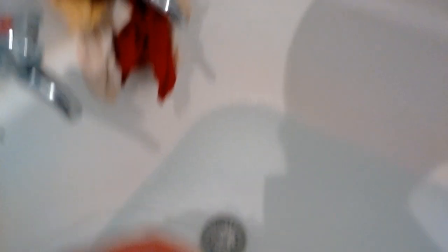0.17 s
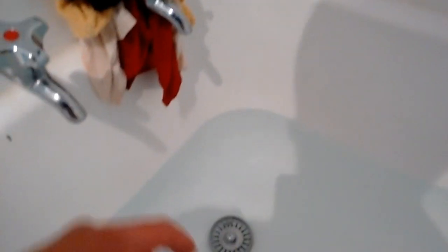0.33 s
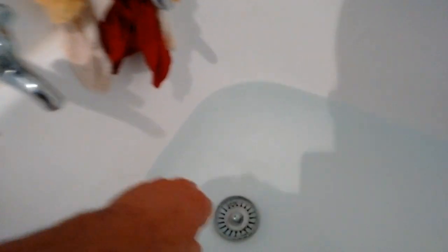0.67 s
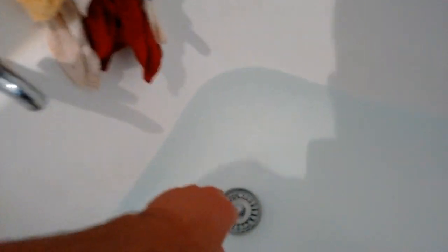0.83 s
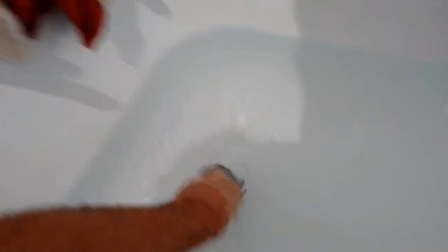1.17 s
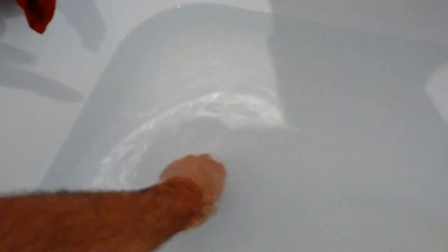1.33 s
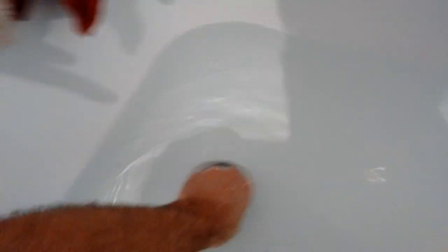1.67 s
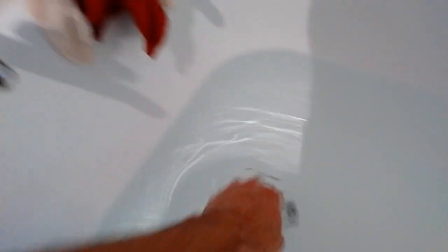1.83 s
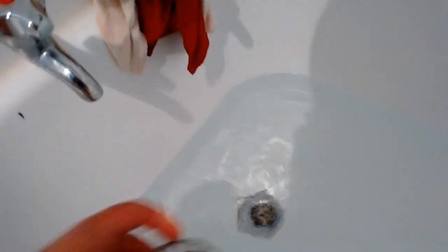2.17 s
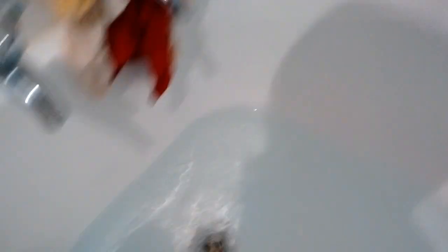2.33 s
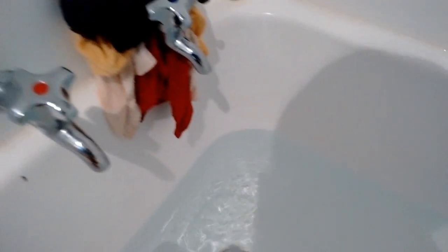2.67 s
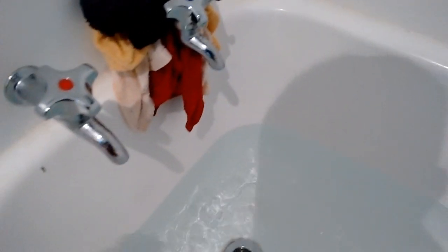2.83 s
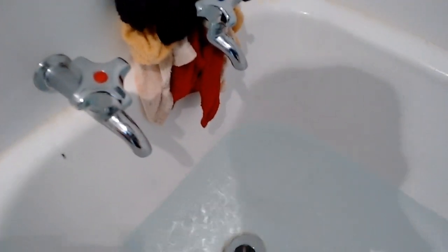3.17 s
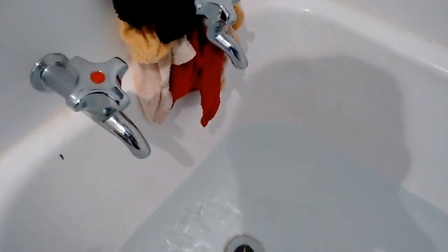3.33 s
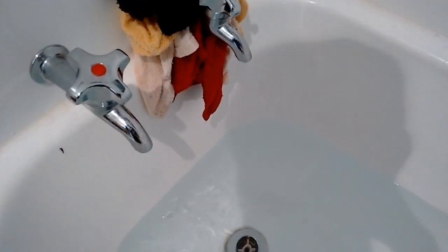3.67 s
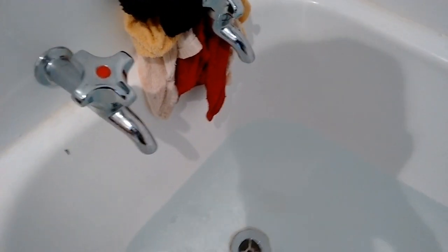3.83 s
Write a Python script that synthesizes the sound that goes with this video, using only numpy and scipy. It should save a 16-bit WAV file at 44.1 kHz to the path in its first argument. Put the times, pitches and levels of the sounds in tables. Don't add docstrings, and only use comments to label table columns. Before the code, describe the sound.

Water draining from a bathtub, with soft splashes, plopping bubbles and a growing gurgle

```python
import sys
import numpy as np
from scipy import signal
from scipy.fft import rfft, irfft
from scipy.io import wavfile
from scipy.ndimage import uniform_filter1d

SR = 44100
rng = np.random.default_rng(int(sys.argv[2]) if len(sys.argv) > 2 else 0)


def wav_out(sig):
    wavfile.write(sys.argv[1], SR, np.round(np.clip(np.atleast_2d(sig).T, -1, 1) * 32767).astype(np.int16))


def boost_factor(decibels):
    exponent = np.asarray(decibels, float) / 20
    return 10 ** exponent


N = 176400
START_S = 0.075

# (frequency [Hz], level [dB])
HISS_TONE = [(12, -10.5), (38, 0), (53, -13), (70, -43), (367, -23), (513, -28.5), (1760, -38),
             (11800, -40), (16000, -38)]
WHINES_HZ = 11330, 16150
# (time [s], level [dB])
CHURN = [(.05, -47), (.5, -48.5), (.7, -57.5), (1.0, -54.5), (1.65, -60), (1.82, -48), (2.14, -62),
         (2.2, -44.5), (2.3, -36.5), (2.345, -54), (2.38, -38), (2.55, -39.5), (2.74, -31.5), (2.86, -36.5),
         (3.25, -34), (3.65, -34), (3.85, -33), (4.0, -33)]
# (frequency [Hz], level [dB])
ROAR_TONE = [(25, 9), (45, 13.5), (110, -0.5), (450, -4.5), (1000, -9.5), (1800, -16), (3200, -16),
             (4500, -50)]
# (frequency [Hz], width [Hz], level [dB])
PIPE_MODES = [(114.4, 11.6, 11), (164.1, 5.7, 4.5), (330, 78, 6), (460.6, 6.8, 4), (699, 7.1, -8),
              (798, 9.8, -10.5)]
# (time [s], level [dB])
GRIP = [
    (.05, -92),
    (.4, -40),
    (.6, -38),
    (.7, -67),
    (1.65, -54),
    (1.85, -31.5),
    (2.15, -57),
    (2.75, -29),
    (3.3, -42),
    (4.0, -65),
]
# (frequency [Hz], level [dB])
GRIP_TONE = [(20, 28), (40, 11), (80, 11.5), (180, -3.5), (300, -63)]
# (time [s], level [dB], pitch [Hz])
KNOCKS = [(0.098, -23.5, 470), (0.18, -32, 493), (0.346, -31, 55), (0.41, -31, 472), (0.431, -30.5, 360),
          (0.553, -26.5, 81), (0.981, -37, 392), (1.012, -38, 400), (1.068, -38, 248), (1.554, -40, 463),
          (1.6, -46, 450), (1.727, -32.5, 302), (1.776, -31, 470), (1.792, -36, 524), (1.816, -44, 124),
          (1.839, -33, 149), (1.919, -33, 69), (2.165, -36, 300), (2.178, -24, 414), (2.244, -25.5, 365),
          (2.358, -23, 175), (2.39, -21.5, 109), (2.51, -22, 216), (2.586, -24, 346), (2.644, -23.5, 200),
          (2.683, -26, 168), (2.711, -29, 200), (2.731, -19, 350), (2.759, -22, 165), (2.774, -25, 197),
          (2.943, -24, 124), (3.079, -38, 170), (3.169, -34, 212), (3.362, -22, 111), (3.709, -26, 250),
          (3.728, -24, 300), (3.805, -26, 336), (3.846, -24, 174), (3.865, -15.5, 255), (3.882, -18.5, 380),
          (3.926, -20.5, 292), (3.954, -17.5, 305), (3.978, -15.5, 327)]
# (time [s], level [dB], pitch [Hz], length [cycles to die away])
BUBBLES = [(.1, -35.5, 694, 41), (.112, -38, 438, 68), (1.408, -23.5, 1374, 51), (1.427, -16, 1600, 22),
           (1.443, -24, 1360, 47), (1.813, -28.5, 1180, 30), (2.206, -30, 1094, 57), (2.268, -31, 1180, 56),
           (2.279, -28.5, 1275, 72), (2.356, -20, 1134, 24), (2.404, -28, 537, 56),
           (2.413, -24.5, 1210, 27), (2.432, -31, 505, 84), (2.477, -28.5, 2507, 82),
           (2.52, -26.5, 1050, 17), (2.537, -27, 960, 24), (2.684, -26, 1566, 106), (2.683, -24, 3170, 38),
           (2.715, -15.5, 3010, 52), (2.72, -20.5, 1184, 28), (2.731, -21, 1350, 50),
           (2.746, -22.5, 1520, 44), (2.761, -27.5, 1170, 33), (2.75, -25, 723, 88), (2.823, -34, 1220, 79),
           (2.877, -21.5, 2990, 64), (2.926, -28.5, 1340, 30), (3.011, -17, 3280, 43),
           (3.112, -29.5, 1024, 25), (3.136, -19.5, 1770, 33), (3.276, -12, 1074, 126),
           (3.424, -20, 810, 35), (3.434, -20.5, 836, 57), (3.472, -26, 820, 40), (3.52, -37, 4200, 33),
           (3.581, -17.5, 922, 52), (3.605, -24.5, 892, 100), (3.648, -35.5, 1334, 240),
           (3.69, -19, 2320, 42), (3.734, -25.5, 4430, 33), (3.792, -13, 3070, 27),
           (3.803, -26.5, 3360, 180), (3.961, -59, 1110, 25), (3.974, -32.5, 4220, 63),
           (3.978, -28, 930, 31)]
# (time [s], level [dB], pitch [Hz])
TICKS = [(0.2138, -37, 10100), (0.5618, -34.5, 10600), (1.314, -36, 11200), (1.371, -27, 5930),
         (1.4272, -14.5, 4350), (1.4545, -14, 11200), (1.577, -33, 13300), (2.4738, -32, 11300),
         (2.4972, -25.5, 5400), (2.6832, -25.5, 10600), (2.7024, -27.5, 8900), (2.7205, -20.5, 8400),
         (2.7569, -11.5, 11700), (2.801, -22, 8900), (2.852, -36, 11100), (2.874, -23, 5700),
         (2.944, -17.5, 11000), (3.0092, -14.5, 8900), (3.0318, -15, 12400), (3.135, -20.5, 12800),
         (3.347, -22.5, 11500), (3.446, -29, 11500), (3.6404, -25.5, 13600), (3.6624, -21, 6940),
         (3.685, -24, 12400), (3.738, -26.5, 12000), (3.7778, -27, 11100), (3.79, -16, 5450),
         (3.794, -18, 10600), (3.8626, -24.5, 11800), (3.892, -29.5, 12600)]
# (time [s], level [dB])
SPRAY = [(1.3, -72), (1.36, -58.5), (1.72, -81), (2.62, -67), (2.7, -51.5), (2.78, -55), (2.9, -50),
         (3.05, -50.5), (3.13, -53.5), (3.3, -55), (3.6, -63.5), (3.8, -56), (4.0, -65)]
# (frequency [Hz], level [dB])
MIST_TONE = [(2000, 5), (4000, 5), (11000, 12), (16000, 8)]
# (time [s], level [dB], t60 [s], treble [dB])
SLAPS = [
    (1.404, -22.5, 0.25, 5),
    (1.419, -20, 0.49, 1.5),
    (1.8053, -25.5, 0.15, -6),
    (2.208, -22, 0.34, -7.5),
    (2.353, -13, 0.17, -5.5),
    (2.757, -30, 0.25, 11),
    (3.032, -42, 0.14, 0),
    (3.133, -28.5, 0.52, -6.5),
    (3.7918, -28, 0.17, 9),
]
# (frequency [Hz], level [dB])
SLAP_TONE = [(80, -7), (400, 1.5), (1300, -2), (2500, -3.5), (5000, -6), (10000, -6), (16000, -14)]
# (frequency [Hz], t60 [s])
TILES = [(100, 0.12), (1000, 0.5), (4000, 0.21), (12000, 0.1)]
# (frequency [Hz], level [dB])
ROOM_SHARE = [(1200, -17), (2800, -7)]
# (frequency [Hz], level [dB])
BODY_SHADE = [(500, -3.5), (1500, -14), (8000, -10.5)]
# (frequency [Hz], level [dB])
LEFT_MIC = [(600, 0), (3000, -3)]
# (frequency [Hz], level [dB])
CROSS_FEED = [(150, -12), (900, -4), (2500, -2.5), (5000, -4.5), (15000, -14)]
# (frequency [Hz], level [dB])
LEFT_TRIM = [(30, -10), (110, -3), (500, 0.5), (3000, -0.5), (8000, -1.5), (15000, -10)]
# (frequency [Hz], level [dB])
BAND_EDGES = [(22, -20), (38, 0), (15500, 0), (15750, -22), (16400, -32), (17000, -70)]


def evened(x):
    return x / np.sqrt(np.mean(x ** 2) + 1e-20)


def read(points, hz):
    f, value = np.transpose(points)
    return np.interp(np.log(hz + 1), np.log(f + 1), value)


def curve(points):
    s, db = np.transpose(points)
    return boost_factor(np.interp(np.arange(N) / SR, s, db, left=-120))


def opening(length_s):
    return np.clip((np.arange(N) / SR - START_S) / length_s, 0, 1)


def add(mix, s, sound):
    part = mix[round(s * SR):][:len(sound)]
    part += sound[:len(part)]


def colour(x, points):
    n = x.shape[-1]
    return irfft(rfft(x) * boost_factor(read(points, np.fft.rfftfreq(n, 1 / SR))), n)


def resonate(x, hz, width):
    return signal.lfilter(*signal.iirpeak(min(hz, SR / 2.2), hz / width, SR), x)


def noise(points, patchy_db, same):
    frames, hz = N // 128 + 5, np.fft.rfftfreq(512, 1 / SR)
    a, b, c, d, patches = rng.standard_normal((frames, 257, 5)).T
    patches = evened(uniform_filter1d(uniform_filter1d(patches, 8, 0), 10, 1))
    same = np.clip(same * np.exp(-hz / 3000), -1, 1)[:, None]
    left = a + 1j * b
    right = same * left + np.sqrt(1 - same ** 2) * (c + 1j * d)
    z = np.array([left, right]) * boost_factor(patchy_db * patches)
    sound = signal.istft(z, nperseg=512, noverlap=384)[1][:, :N]
    return evened(colour(sound, points))


def ring(hz, cycles, rise):
    t = np.arange(round(min(cycles / hz, .3) * SR)) / SR
    u = t * hz / cycles
    tone = np.sin(2 * np.pi * hz * t * (1 + rise * u))
    return tone * boost_factor(-60 * u) * np.minimum(t * hz, 1)


def swarm(per_s, low_hz, high_hz, cycles, spread_db, tilt_db, count=30):
    births = rng.random(N) < per_s / SR
    size = boost_factor(spread_db * np.minimum(rng.exponential(1, N), 4)) * births
    kind = rng.integers(0, count, N)
    out = np.zeros(N)
    for k, hz in enumerate(np.geomspace(low_hz, high_hz, count)):
        pops = signal.oaconvolve(size * (kind == k), ring(hz, cycles, 0.26))[:N]
        out += boost_factor(tilt_db * k / count) * pops
    return evened(out)


def room(x):
    taps = np.zeros((2, SR // 2))
    at = np.arange(120, SR // 2 - 20, 20) + rng.integers(0, 20, (2, (SR // 2 - 121) // 20))
    np.put_along_axis(taps, at, rng.choice([-1., 1.], at.shape), 1)
    hz, t, z = signal.stft(taps, SR, nperseg=256)
    tail = signal.istft(z * boost_factor(-60 * t / read(TILES, hz)[:, None]), SR, nperseg=256)[1]
    return signal.fftconvolve(x[None], tail / np.linalg.norm(tail[0]), axes=1)[:, :N]


def aimed(x):
    return np.array([colour(x, BODY_SHADE), x])


def in_drain(grains):
    return 0.29 * aimed(grains) + boost_factor(-12) * room(grains)


def stillness():
    hum = evened(resonate(rng.standard_normal((2, N)), 49.7, 1.1))
    whine = sum(evened(resonate(rng.standard_normal((2, N)), hz, 130)) for hz in WHINES_HZ)
    hiss = noise(HISS_TONE, patchy_db=.6, same=-.3)
    hiss_db, whine_db, hum_db = -46.5, -64, -48.5
    return (boost_factor(hiss_db) * hiss + boost_factor(whine_db) * whine) * opening(.4) + boost_factor(hum_db) * hum


def churning_drain():
    roar = noise(ROAR_TONE, patchy_db=4.5, same=1.0)
    lumps = noise([(20, 0), (2000, 0)], patchy_db=1.5, same=0.86)
    pipe = evened(sum(boost_factor(db) * evened(resonate(lumps, hz, width)) for hz, width, db in PIPE_MODES))
    glugs = swarm(400, 200, 2000, cycles=14, spread_db=4.3, tilt_db=-5)
    roar_db, pipe_db = -3.5, -3
    churn = curve(CHURN)
    return churn * (boost_factor(roar_db) * roar + boost_factor(pipe_db) * pipe) + in_drain(churn * glugs)


def grip():
    return curve(GRIP) * noise(GRIP_TONE, patchy_db=1, same=0.53)


def knocks():
    out = np.zeros(N)
    for s, db, hz in KNOCKS:
        add(out, s, boost_factor(db) * ring(hz, 12, -.2))
        add(out, s, boost_factor(db - 6) * ring(2 * hz, 1.8, 0))
    return out


def bubbles():
    out, t = np.zeros(N), np.arange(400) / SR
    rise, click_db, neighbour_db = .03, -15, -3
    for s, db, hz, cycles in BUBBLES:
        add(out, s, boost_factor(db) * ring(hz, cycles, rise))
        pitch_db = 8 * np.log2(min(hz / 2500, 1))
        for late, off in rng.random((3, 2)):
            level = boost_factor(db + neighbour_db + pitch_db - 10 * late)
            add(out, s + .04 * late, level * ring(hz * (.9 + .35 * off), 30, rise))
        add(out, s, boost_factor(db + click_db - 60 * t / 0.014) * rng.standard_normal(400))
    return out


def ticks():
    out, t = np.zeros(N), np.arange(900) / SR
    for s, db, hz in TICKS:
        puff = rng.standard_normal(900) * boost_factor(-60 * t / 0.012)
        snap = resonate(puff, hz, hz / 3) + 0.04 * np.diff(puff, prepend=0)
        add(out, s, boost_factor(db + 0.5) * snap)
    return aimed(out) + room(out)


def drain_spray():
    mist = noise(MIST_TONE, patchy_db=1.5, same=.4)
    fizz = swarm(900, 2500, 15000, cycles=4, spread_db=4, tilt_db=0)
    mist_db, fizz_db = 9, -8
    spray = curve(SPRAY)
    return spray * boost_factor(mist_db) * mist + in_drain(spray * boost_factor(fizz_db) * fizz)


def slaps():
    out, t = np.zeros(N), np.arange(SR // 2) / SR
    froth = swarm(700, 600, 2200, cycles=20, spread_db=4, tilt_db=-3)
    snap = boost_factor(-6 - 60 * t / .03)
    for s, db, t60, treble_db in SLAPS:
        hiss = colour(rng.standard_normal(len(t)), SLAP_TONE)
        hiss = evened(colour(hiss, [(700, -treble_db - 5.5), (2000, 0), (8000, treble_db)]))
        lumpy = boost_factor(4.5 * evened(uniform_filter1d(rng.standard_normal(len(t)), 120)))
        foam = np.resize(froth[round(s * SR):], len(t))
        body = hiss * lumpy + boost_factor(-20.5 - 2 * treble_db) * foam
        add(out, s, boost_factor(db - 16.5) * body * (boost_factor(-60 * t / t60) + snap))
    return out


def scene():
    near = knocks() + bubbles() + slaps()
    water = aimed(near) + room(colour(near, ROOM_SHARE)) + ticks()
    return water + churning_drain() + drain_spray() + grip() + stillness()


def low_pass(x):
    return signal.sosfilt(signal.butter(12, 16660, fs=SR, output="sos"), x)


def record(dry):
    delay_s, flatten = .000422, .6
    hz = np.fft.rfftfreq(N, 1 / SR)
    flat = np.ones(len(hz))
    late = boost_factor(read(CROSS_FEED, hz)) * np.exp(-2j * np.pi * hz * delay_s)
    z = rfft(dry) * np.array([boost_factor(read(LEFT_MIC, hz)), flat])
    z = (z - z[::-1] * late) / (1 - flatten * late)
    z = z * np.array([boost_factor(read(LEFT_TRIM, hz)), flat])
    mix = colour(irfft(z, N), BAND_EDGES) * opening(0.032) ** 2
    return low_pass(mix)


dry = scene()
out = record(dry)
wav_out(out)
```